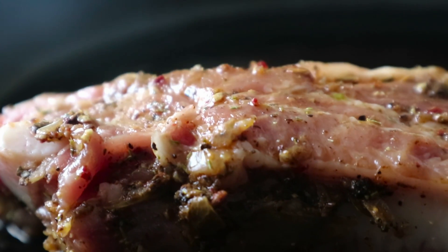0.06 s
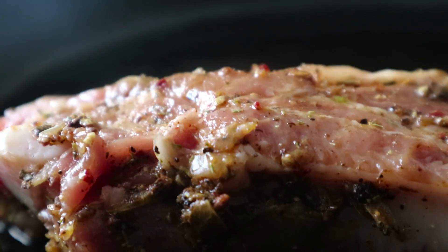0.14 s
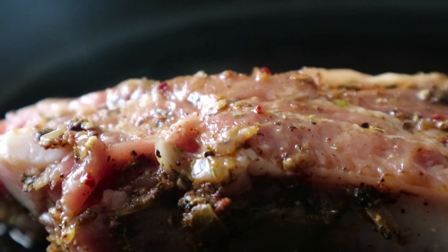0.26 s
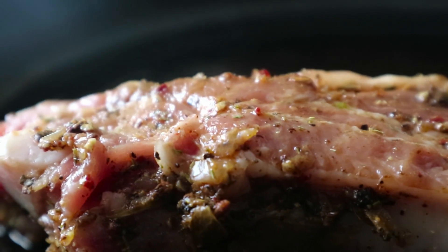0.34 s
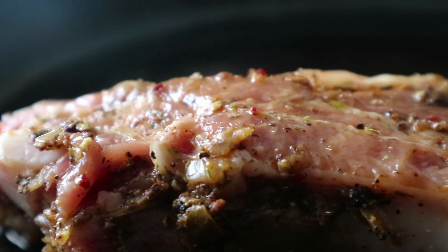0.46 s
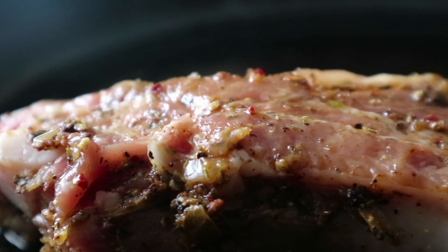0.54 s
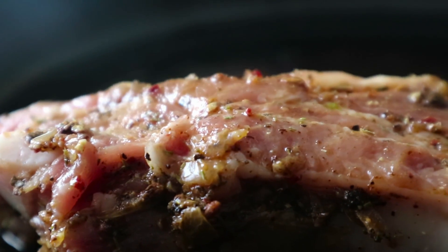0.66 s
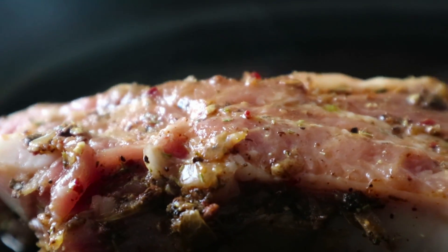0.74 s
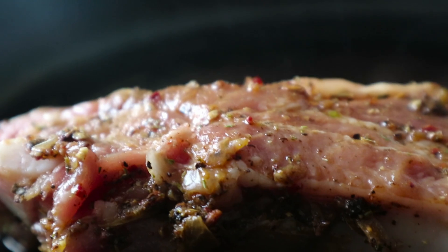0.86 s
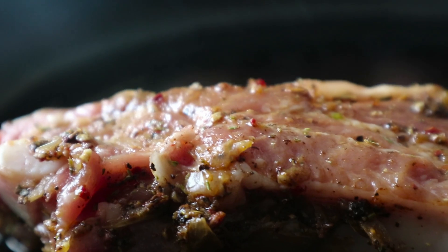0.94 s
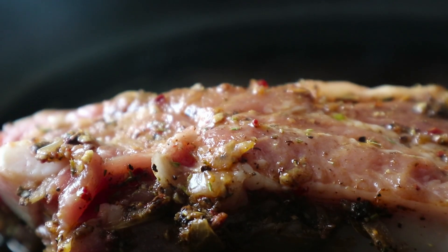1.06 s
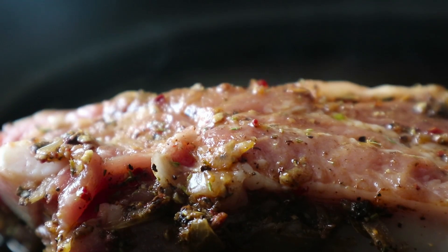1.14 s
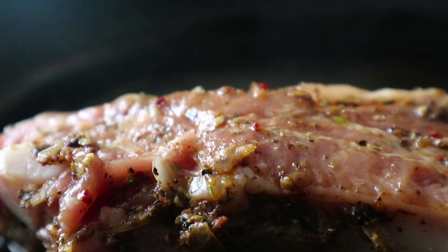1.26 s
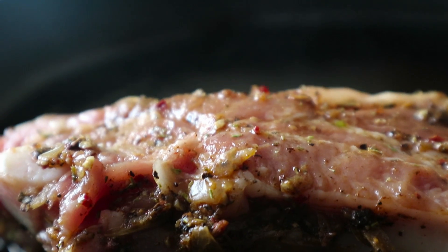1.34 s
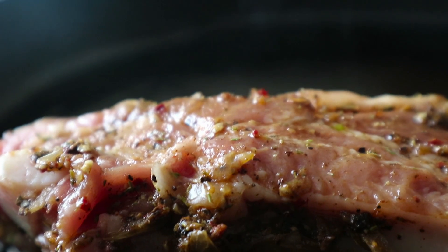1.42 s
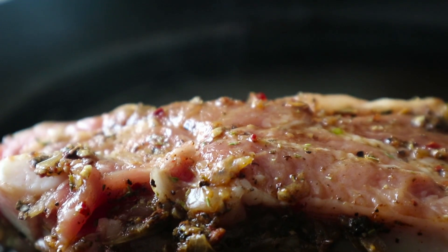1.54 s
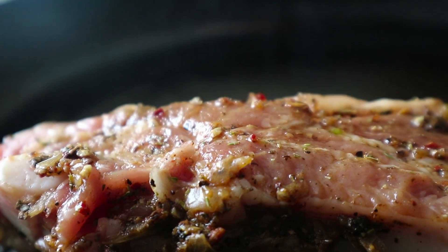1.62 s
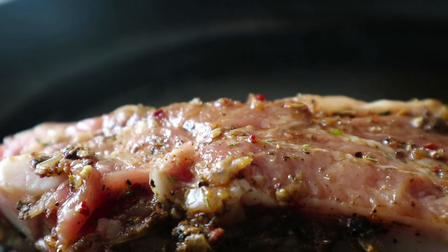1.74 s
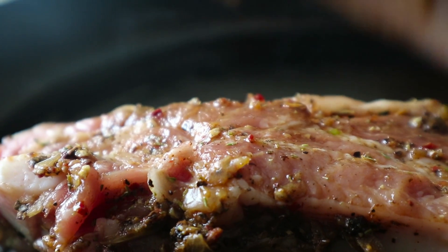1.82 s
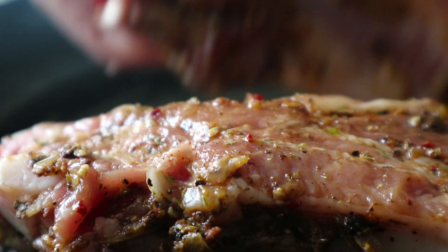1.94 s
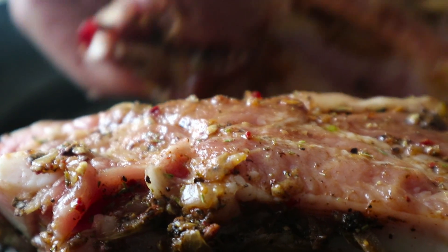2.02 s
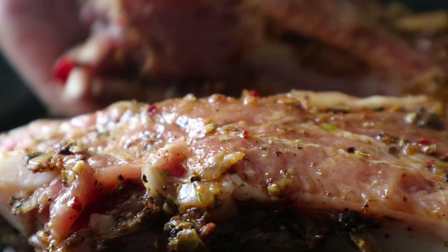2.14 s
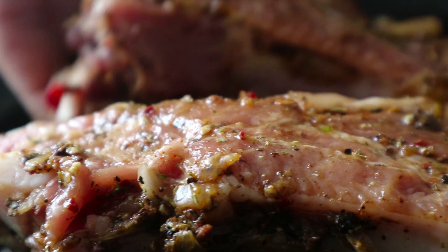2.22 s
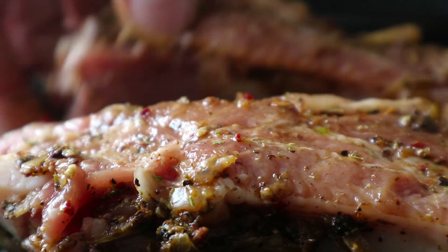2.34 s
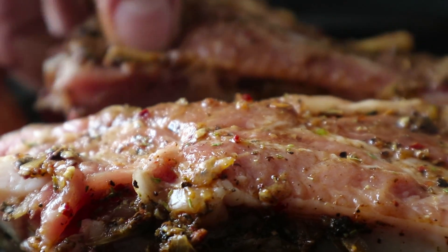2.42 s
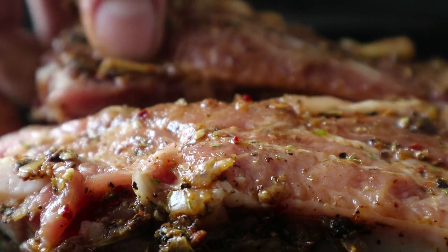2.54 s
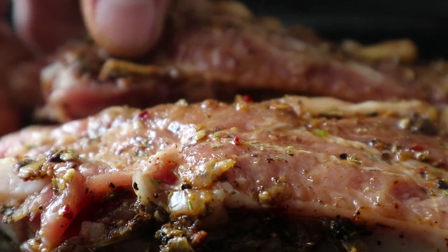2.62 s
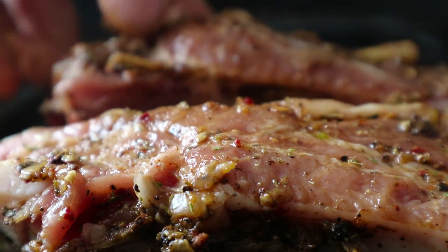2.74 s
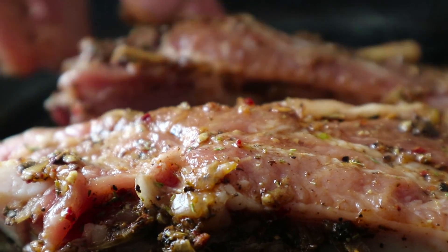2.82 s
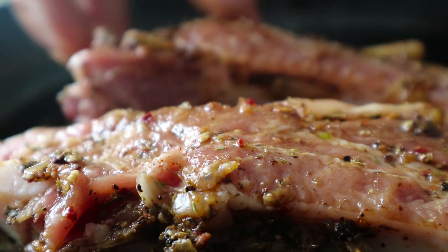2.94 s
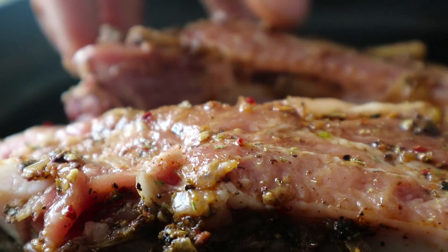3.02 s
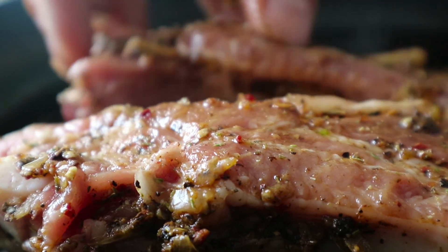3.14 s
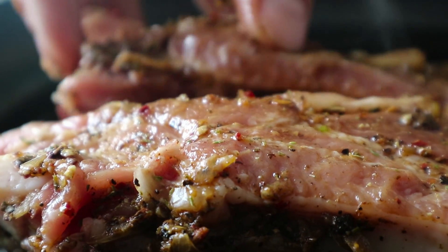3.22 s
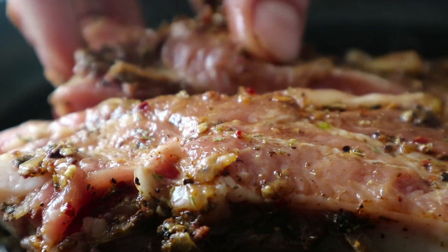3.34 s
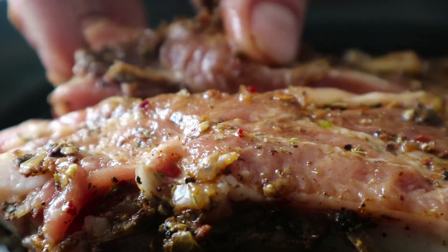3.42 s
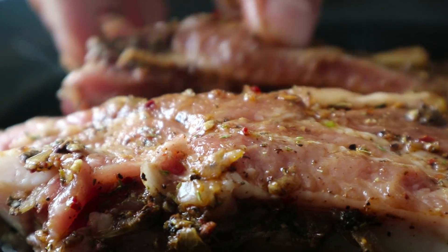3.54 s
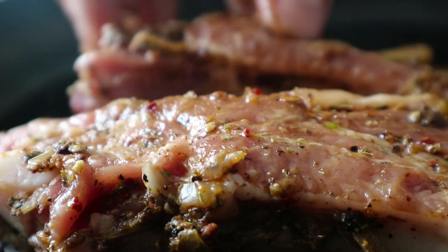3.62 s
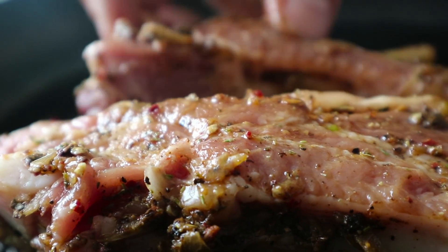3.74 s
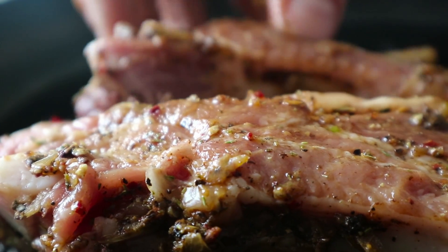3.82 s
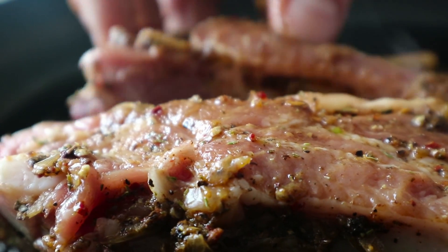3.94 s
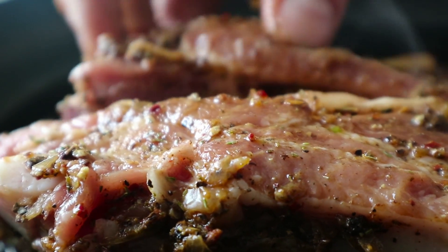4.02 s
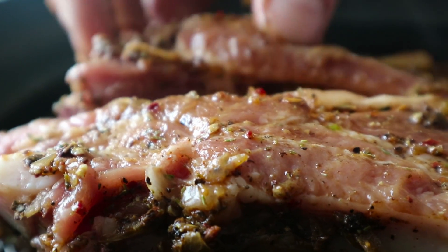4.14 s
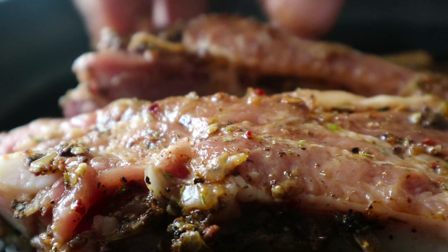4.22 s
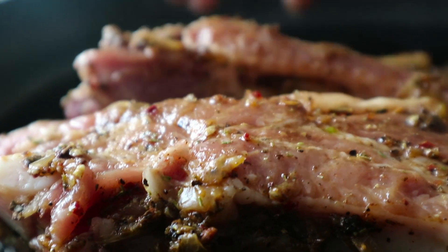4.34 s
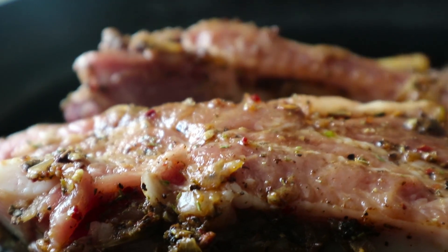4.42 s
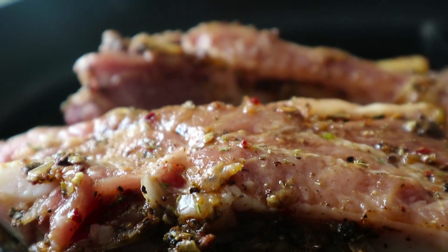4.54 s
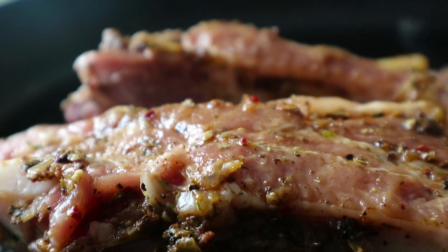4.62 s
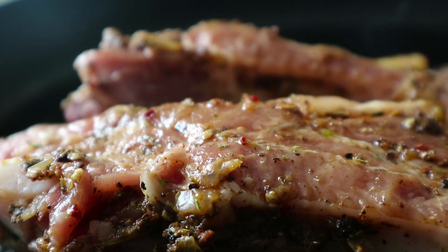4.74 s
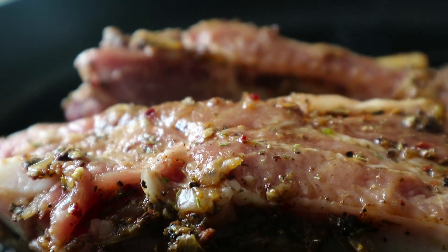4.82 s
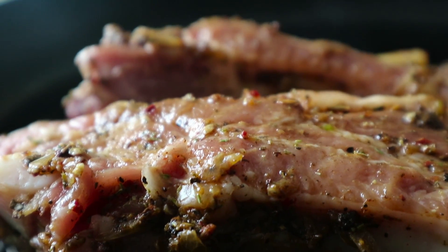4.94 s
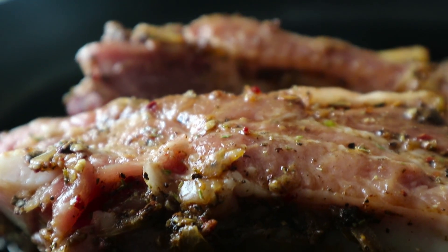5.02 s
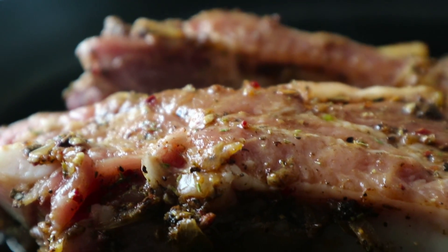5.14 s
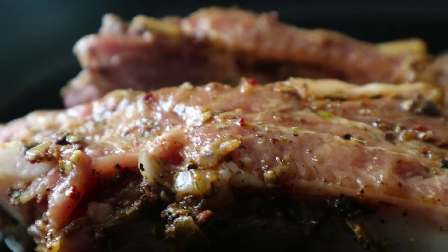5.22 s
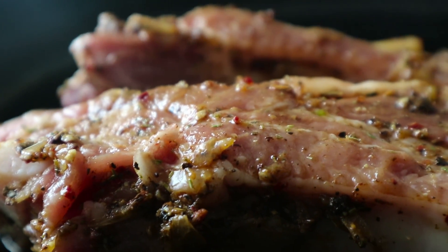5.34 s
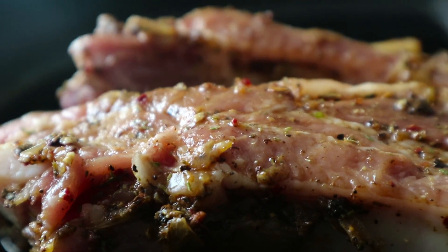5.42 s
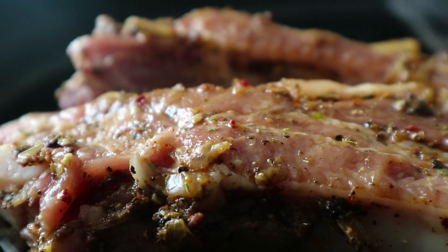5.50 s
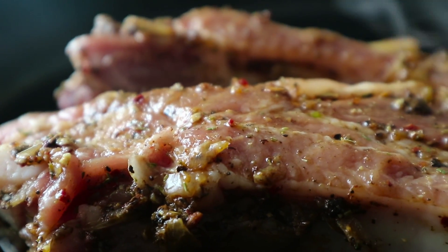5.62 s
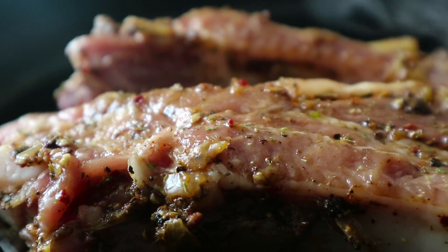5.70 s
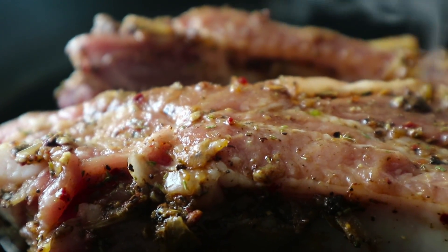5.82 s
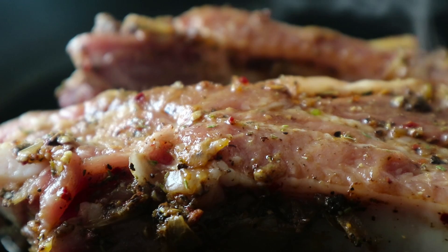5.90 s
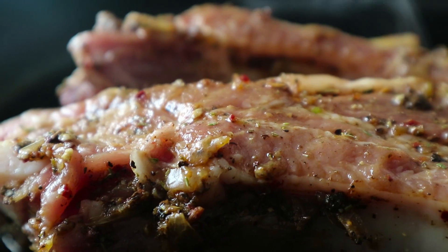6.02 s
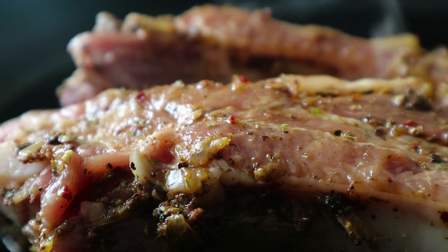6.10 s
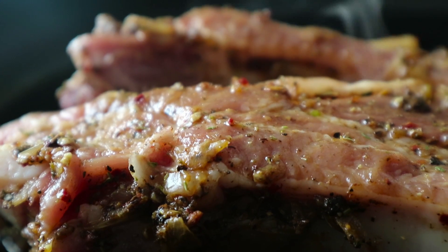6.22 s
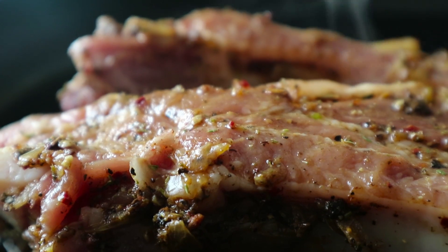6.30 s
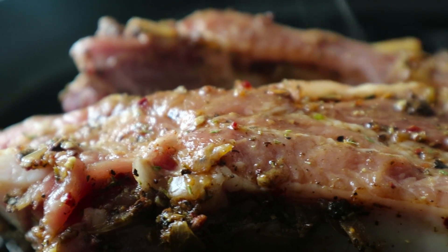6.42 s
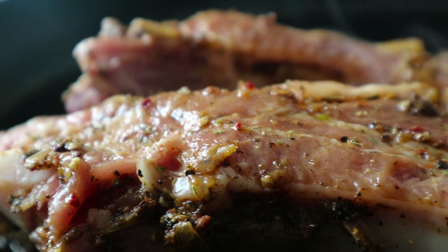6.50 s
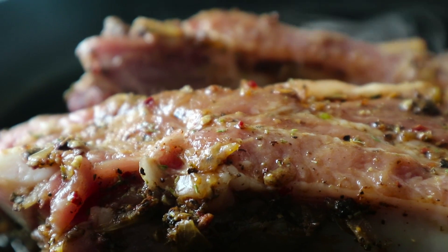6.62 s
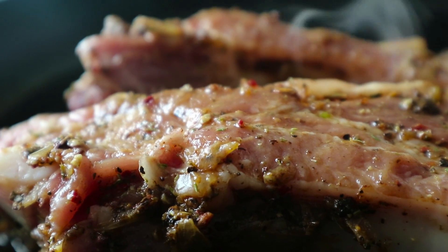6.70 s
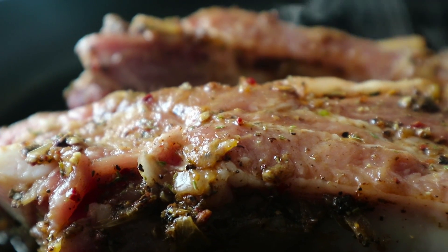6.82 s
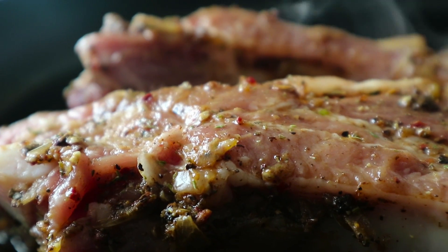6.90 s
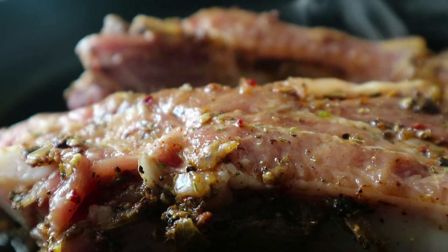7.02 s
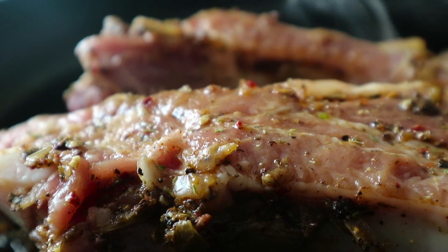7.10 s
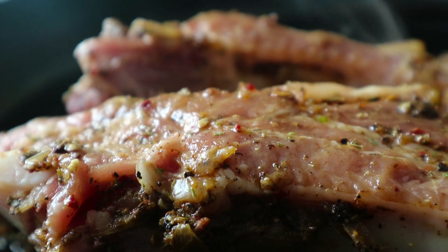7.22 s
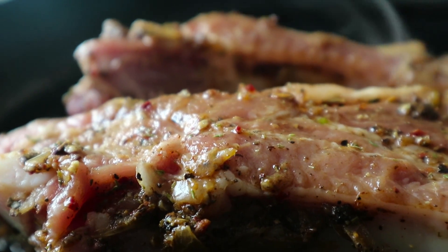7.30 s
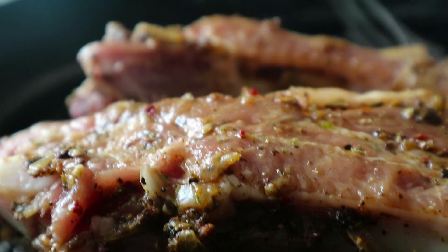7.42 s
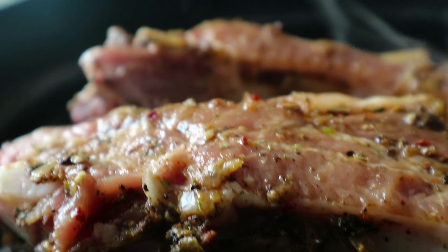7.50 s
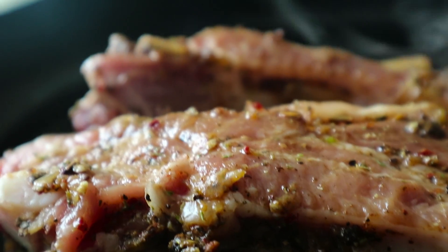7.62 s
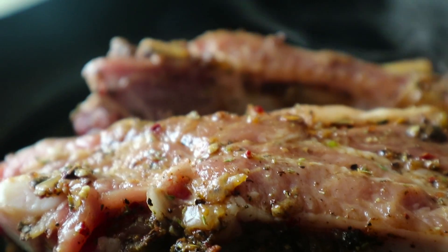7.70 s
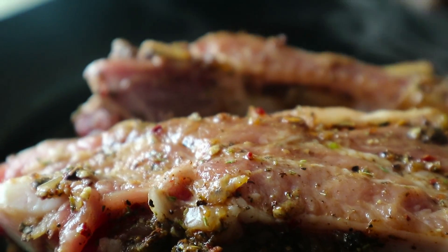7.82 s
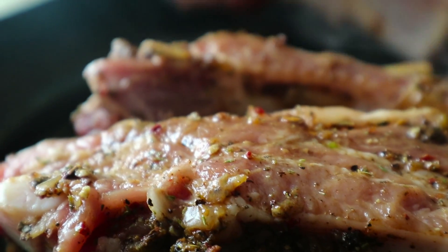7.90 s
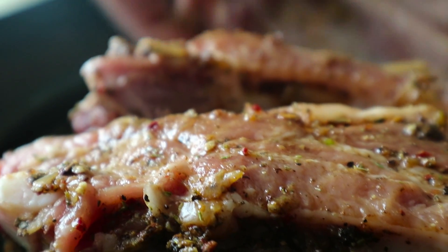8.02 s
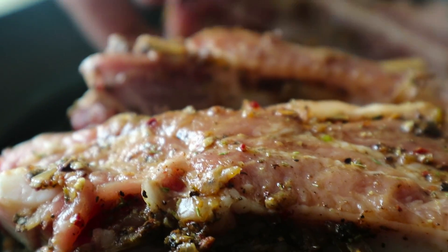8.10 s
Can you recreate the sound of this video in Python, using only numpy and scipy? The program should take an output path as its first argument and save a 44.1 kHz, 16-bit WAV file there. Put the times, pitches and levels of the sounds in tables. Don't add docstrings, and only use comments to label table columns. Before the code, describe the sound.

Stereo microphones at arm's length from a frying pan. Thin hiss and light bubbling come first, then wet meat touches hot oil: a fast rise to dense sizzling, airy steam squeals sinking and rising in pitch as it is pressed, and hard snaps of fat. After release the hiss drops, leaving drier, grainier frying and loud scattered pops in a small reflective kitchen.

```python
import sys
import numpy as np
from scipy import signal
from scipy.fft import rfft, irfft, next_fast_len
from scipy.io import wavfile
from scipy.ndimage import uniform_filter1d, map_coordinates

SR = 44100
rng = np.random.default_rng(int(sys.argv[2]) if len(sys.argv) > 2 else 0)


def to_wav(sig):
    pcm = np.clip(np.atleast_2d(sig), -1, 1) * 32767
    pcm = np.round(pcm).astype(np.int16)
    wavfile.write(sys.argv[1], SR, pcm.T)


def linear_from_db(decibels):
    return 10 ** (np.asarray(decibels, float) / 20)


N = 359856

# (time [s], level [dB])
SIZZLE_LEVEL = [(2.05, -45), (2.13, -43.5), (2.28, -37), (2.46, -33), (2.63, -33.5), (2.85, -31.5),
                (3.02, -31), (3.2, -29.5), (3.45, -32), (3.64, -31.5), (3.78, -29), (4.02, -27.5),
                (4.28, -31.5), (4.55, -33.5), (5.55, -35), (6.31, -35), (7.3, -35), (8.16, -35.5)]
# (frequency [Hz], level [dB])
ROOM_RETURN = [(300, -3.5), (1400, -5), (3000, 3.5), (7000, -1.5), (15000, 11)]


def unit(x):
    return x / np.sqrt(np.mean(x ** 2) + 1e-20)


def along(points, hz):
    f, v = np.transpose(points)
    return np.interp(np.log(hz + 1), np.log(f + 1), v)


def curves(rows, before_db=None, after_db=None):
    s, *cols = np.transpose(rows)
    return [np.interp(np.arange(N) / SR, s, c, before_db, after_db) for c in cols]


def wobble(rate):
    knots = rng.standard_normal(int(N * 400 / SR))
    return map_coordinates(knots, [np.arange(N) * rate / SR])


def filtered(x, response):
    m = next_fast_len(N + SR // 2)
    return irfft(rfft(x, m) * response(np.fft.rfftfreq(m, 1 / SR)), m)[..., :N]


def coloured(x, spectrum):
    hz, power = signal.welch(x[0], SR, nperseg=256, detrend=False)

    def swap(f):
        return linear_from_db(along(spectrum, f)) / np.sqrt(np.interp(f, hz, power) + 1e-14)
    return unit(filtered(x, swap))


def late_left(x):
    return np.array([np.roll(x, 2), x])


def bursts(s, db, hz, pan_db, lag, life, size, front=None):
    k = np.arange(size) - size // 4
    if front is None:
        rise_cycles, steepness = .56, 4
    else:
        rise_cycles, steepness = front[:, None], 2.6
    out = np.zeros((2, N + size))
    for ch, side in enumerate((.5, -.5)):
        at = s * SR + side * lag
        u = (k - (at % 1)[:, None]) * (hz / SR)[:, None]
        rise = np.exp(-np.abs(u / rise_cycles) ** steepness)
        decay = np.exp(-np.abs(u / life[:, None]) ** 1.4)
        shape = np.where(u < 0, rise, decay)
        wave = linear_from_db(db + side * pan_db)[:, None] * shape * np.cos(2 * np.pi * u) * signal.windows.tukey(size)
        where = np.clip(at.astype(int)[:, None] + k, 0, N + size - 1)
        out[ch] = np.bincount(where.ravel(), wave.ravel(), N + size)
    return out[:, :N]


def fizz(count, mid_hz, spread, scatter_db, life, lag, lag_spread):
    s = rng.uniform(0, N / SR, count)
    g = rng.standard_normal((count, 3))
    db = scatter_db * np.minimum(rng.exponential(size=count), 2.9)
    hz = np.clip(mid_hz * np.exp(spread * g[:, 0]), 500, 14000)
    return bursts(s, db, hz, 2.9 * g[:, 1], lag + lag_spread * g[:, 2], np.full(count, life), size=64)


def hiss(patchy_db):
    z = signal.stft(rng.standard_normal(N), nperseg=512)[2]
    field = uniform_filter1d(rng.standard_normal(z.shape), 7, 0)
    field = uniform_filter1d(field, 9, 1)
    return late_left(signal.istft(z * linear_from_db(patchy_db * unit(field)), nperseg=512)[1][:N])


def rumble():
    # (frequency [Hz], density [dB per Hz])
    low_colour = [(12, -54), (20, -20), (38, -23), (81, -23.5), (168, -5.5), (319, -14), (400, -1),
                  (520, 3.5), (880, -120)]
    # (time [s], level [dB])
    thuds = [(.1, -66), (.25, -64), (.4, -66), (.77, -64), (2.89, -57), (3.27, -61), (3.75, -61),
             (3.88, -63), (4.02, -56), (4.15, -61), (2.6, -63), (6.3, -63), (6.87, -63), (5.38, -61),
             (5.6, -62), (6.04, -62), (7.48, -62)]
    hum_db, thud_s = -62.5, .05
    a, b = rng.standard_normal((2, N)) * linear_from_db(3.5 * wobble(12))
    t = np.arange(N) / SR
    level = linear_from_db(hum_db) + sum(linear_from_db(db) * np.exp(-((t - s) / thud_s) ** 2) for s, db in thuds)
    return level * coloured(np.array([a + 0.59 * b, a - 0.61 * b]), low_colour)


def first_rib():
    # (time [s], level [dB])
    simmer_level = [(0.0, -35.5), (1.38, -36), (2.0, -35)]
    # (frequency [Hz], density [dB per Hz])
    simmer_colour = [(90, -50), (150, -26.5), (400, -17.5), (800, -11), (1300, -9.5), (1750, -6.5),
                     (2300, -11), (3260, -12.5), (5000, -15), (6000, -13.5), (7500, -18.5), (10000, -23),
                     (15800, -36.5)]
    level_db, = curves(simmer_level)
    oil = unit(fizz(count=12000, mid_hz=2250, spread=0.68, scatter_db=3.5, life=1.6, lag=.3, lag_spread=1.2))
    sputter_db = 0.85 * wobble(5.7) + 0.99 * wobble(60)
    return linear_from_db(level_db + sputter_db) * coloured(oil + 1.26 * unit(hiss(patchy_db=0.5)), simmer_colour)


def second_rib():
    # (frequency [Hz], density [dB per Hz])
    bubbling_colour = [(150, -70), (300, -22), (700, -15), (950, -10), (1200, -3), (1970, -1), (2700, -3),
                       (3200, 1), (4000, -3), (4830, -9.5), (7300, -13), (12000, -26.5), (16000, -33)]
    # (frequency [Hz], density [dB per Hz])
    steam_colour = [(500, -23), (1500, -6.5), (3000, -2), (5000, -0.5), (7000, -4.5), (10000, -11.5),
                    (13000, -22), (15800, -28)]
    wet_until_s, drying_s = 3.95, 0.62
    laid_flat_s, tipping_s = 2.47, .07
    t = np.arange(N) / SR
    sizzle_db, = curves(SIZZLE_LEVEL, before_db=-66)
    wet = np.clip((wet_until_s + drying_s - t) / drying_s, 0, 1)
    tipped = np.clip((laid_flat_s - t) / tipping_s, 0, 1)
    bubbling_db = sizzle_db - 7.5 * wet + 3 * tipped
    steam_db = sizzle_db + 2 * wet - 7 * tipped
    sputter_db = 0.12 * wobble(11) + 0.79 * wobble(70)
    oil = unit(fizz(count=16000, mid_hz=2440, spread=.55, scatter_db=4, life=1.1, lag=1.4, lag_spread=.8))
    spray = unit(fizz(count=12000, mid_hz=7270, spread=.5, scatter_db=4.5, life=.9, lag=1.6, lag_spread=.8))
    bubbles = coloured(oil + 0.99 * unit(hiss(patchy_db=1.0)), bubbling_colour)
    bubbles = linear_from_db(bubbling_db + 6.5 + sputter_db) * bubbles
    steam = coloured(spray + 1.5 * unit(hiss(patchy_db=-1.9)), steam_colour)
    steam = linear_from_db(steam_db + 3.0 + sputter_db + 0.69 * wobble(12)) * steam
    return bubbles + steam


def pockets():
    # (time [s], pitch [Hz], level [dB])
    long_pockets = [
        [(2.65, 2077, -38), (2.85, 2060, -29.5), (3.08, 2015, -29), (3.5, 1830, -25), (3.62, 1699, -26.5),
         (3.85, 1657, -32), (4.0, 1595, -34)],
        [(3.5, 1410, -36), (3.9, 1386, -37.5), (4.05, 1270, -26.5), (4.2, 1190, -29.5), (4.3, 1188, -42),
         (4.4, 1235, -56)],
        [(2.75, 3700, -40), (2.95, 3820, -29), (3.3, 3854, -32), (3.55, 4050, -30), (4.25, 4044, -36.5),
         (4.4, 3970, -56)],
        [(4.22, 1387, -32), (4.42, 1442, -34.5), (4.8, 1498, -32.5), (5.05, 1610, -38), (5.3, 1575, -48)],
        [(5.2, 1195, -44), (5.6, 1203, -39), (6.2, 1198, -40), (6.6, 1220, -56)],
    ]
    long_damping = [580, 340, 440, 800, 380]
    # (peak time [s], half length [s], pitch [Hz], level [dB])
    short_puffs = [(4.09, .3, 3040, -28.5), (4.3, .07, 3000, -20.5), (4.46, .16, 3120, -32),
                   (4.17, .3, 790, -40), (6.93, .3, 3300, -33), (3.27, .12, 3120, -33),
                   (3.08, .15, 2000, -32), (1.84, .012, 5700, -38), (3.2, .04, 1700, -25),
                   (7.555, .008, 5500, -24), (7.5855, .008, 5950, -28), (7.534, .008, 3100, -24),
                   (4.4, .15, 1450, -32)]
    puff_damping_hz, puff_fade_db = 380, 18
    sputter_db, waver = 1.3, .012
    puffs = []
    for s, half, hz, db in short_puffs:
        faint_db = db - puff_fade_db
        puffs.append([(s - half, hz, faint_db), (s, hz, db), (s + half, hz, faint_db)])
    dampings = long_damping + [puff_damping_hz] * len(puffs)
    out, t = np.zeros(N), np.arange(500) / SR
    for rows, damping_hz in zip(long_pockets + puffs, dampings):
        span = slice(int(rows[0][0] * SR), int(rows[-1][0] * SR))
        hz, db = (c[span] for c in curves(rows))
        ring = t * np.exp(-np.pi * damping_hz * t)
        jet = np.array([1, 1j]) @ rng.standard_normal((2, N))
        jet = jet * linear_from_db(1.5 * wobble(110) + sputter_db * wobble(25))
        hz = hz * (1 + waver * wobble(30)[span])
        resonance = signal.fftconvolve(jet[span], ring)[:len(hz)]
        tone = np.real(resonance * np.exp(2j * np.pi * np.cumsum(hz) / SR))
        out[span] += unit(linear_from_db(db) * tone) * np.sqrt(np.mean(linear_from_db(2 * db)))
    return late_left(out)


def spits():
    count = 160
    s = rng.uniform(size=count) * N / SR
    g = rng.standard_normal((count, 2))
    sizzle_db = np.maximum(np.interp(s, *np.transpose(SIZZLE_LEVEL)), -46)
    db = np.minimum(13.5 + sizzle_db + 1.5 * g[:, 0], -17)
    return np.array([s, db, 2700 * np.exp(.25 * g[:, 1])])


def pops():
    # (time [s], peak level [dB], pitch [Hz])
    first_pops = [(.0172, -20.5, 1950), (.0304, -19, 4600), (.1179, -20, 1790), (.4238, -21, 4000),
                  (.4438, -19.5, 2000), (.5273, -14.5, 1750), (.5518, -23, 1800), (.6659, -20, 1830),
                  (.721, -21, 1920), (.75, -22.5, 1430), (.7654, -17.5, 2200), (.8199, -22.5, 2030),
                  (.9941, -23, 4100), (1.1405, -18.5, 2000), (1.2191, -22.5, 1880), (1.3309, -23.5, 1840),
                  (1.6331, -27, 2300), (1.6625, -24, 1300), (1.748, -23, 1670), (1.8528, -23, 2900),
                  (2.0708, -11.5, 1500)]
    # (time [s], peak level [dB], pitch [Hz], crack over the usual [dB])
    second_pops = [(2.3806, -15, 2720, 2), (2.5074, -13, 4770, 0), (3.0152, -10, 3900, -3),
                   (3.0163, -8.5, 3800, -6), (3.1303, -12, 3140, 0), (3.2725, -3, 3700, -10),
                   (3.2735, -5, 3900, -8), (3.8589, -9, 3940, -2), (4.5011, -9, 1460, 0),
                   (4.5766, -10, 2550, 3), (4.7143, -8.5, 1640, -2), (4.8648, -6.5, 2800, 4),
                   (4.8672, -12, 1300, 0), (5.0198, -7, 3100, 0), (5.1359, -11, 3410, 0),
                   (5.3788, 0, 2900, -25), (5.5053, -11, 3410, -3), (5.5889, -2.5, 1520, -4),
                   (5.918, -10, 3190, 0), (6.0828, -10, 3840, 0), (6.2126, -11, 3190, 2),
                   (6.9152, -11, 1500, 3), (7.0164, -10, 3310, -3), (7.3313, -6, 1950, 5),
                   (7.4817, -2.5, 1580, -5), (7.5547, -16, 5500, -10), (7.5855, -22, 6000, -10),
                   (7.6423, -15, 2390, 2), (7.6878, -9.5, 2400, 11), (7.7286, -8.5, 4800, 0),
                   (7.7293, -11, 4200, 2), (7.7296, -11, 1500, 0), (7.8436, -6, 2550, 1)]
    # (time [s], peak level [dB], pitch [Hz])
    middling_pops = [(0.0363, -24, 1440), (0.0586, -21, 1700), (0.0751, -25, 1450), (0.227, -24, 2280),
                     (0.3674, -26, 2150), (0.45, -26, 3300), (0.4641, -24, 1950), (0.5945, -26, 1380),
                     (0.7555, -25, 1770), (0.8585, -26, 1700), (0.8808, -24, 1710), (1.042, -26, 1350),
                     (1.0807, -24, 1780), (1.0967, -26, 1360), (1.1343, -26, 1580), (1.2688, -25, 1680),
                     (1.2768, -26, 1940), (1.3037, -26, 1670), (1.3634, -26, 1660), (1.5488, -24, 1730),
                     (1.5676, -25, 1690), (1.6913, -25, 1390), (1.8339, -26, 3520), (1.8574, -25, 1670),
                     (1.9062, -26, 2130), (1.9128, -26, 1910), (1.9633, -25, 1720), (2.1909, -21, 3690),
                     (2.2421, -20, 2950), (2.3055, -19, 1640), (2.3613, -18, 3510), (2.4633, -16, 3420),
                     (2.6582, -13, 3380), (2.7769, -14, 4190), (2.7844, -14, 4820), (2.7984, -14, 1970),
                     (2.8348, -14, 4240), (2.9197, -16, 2360), (2.9846, -12, 2070), (3.5538, -11, 1780),
                     (3.7156, -12, 3170), (3.8113, -11, 2990), (4.0005, -11, 3040), (4.0826, -12, 2150),
                     (4.1636, -12, 1900), (4.4194, -14, 3040),
                     (4.4658, -12, 3000), (4.547, -14, 2070), (4.6652, -15, 2680), (4.7061, -14, 3020),
                  (4.744, -15, 1640), (4.7885, -13, 1560), (4.8051, -15, 2920), (4.9147, -14, 2640),
                  (4.9442, -15, 2710), (4.9871, -15, 1500), (5.1102, -15, 2600), (5.1284, -15, 3040),
                  (5.174, -14, 3790), (5.3313, -14, 2680), (5.3561, -16, 2650), (5.3877, -16, 2780),
                  (5.4185, -15.5, 4600), (5.4467, -15, 1640), (5.5108, -16, 1830), (5.5601, -16, 2450),
                  (5.6079, -15, 2980), (5.6206, -15, 2870), (5.6481, -14, 2730), (5.699, -13, 3250),
                  (5.744, -16, 1470), (5.7985, -13, 3090), (5.8076, -15, 2650), (5.8411, -14, 4110),
                  (5.8528, -16, 2920), (5.8697, -15, 2700), (5.9462, -13, 3120), (5.9561, -16, 1710),
                  (6.072, -15, 1530), (6.1688, -16, 1820), (6.1992, -18, 3040), (6.2357, -13, 1950),
                  (6.3463, -16, 3640), (6.4296, -16, 3670), (6.4392, -15, 2040), (6.4949, -15, 2900),
                  (6.516, -14, 2720), (6.5776, -14, 2700), (6.7844, -14, 1720), (6.9281, -14, 2070),
                  (6.964, -13, 2930), (7.0396, -15, 2820), (7.0653, -15, 1920), (7.1126, -16, 2800),
                  (7.1306, -16, 2320), (7.2351, -14, 2260), (7.2806, -17, 3340), (7.2886, -16, 1700),
                  (7.4587, -16, 2440), (7.475, -16, 3400), (7.534, -16, 3080), (7.803, -14, 2200),
                  (7.9933, -17, 3340), (8.0051, -14, 1100), (8.051, -17, 2610), (8.1486, -16, 4110)]
    # (time [s], peak level [dB], pitch
    # [Hz])
    further_pops = [(0.2509, -25, 1380), (0.2945, -25, 1510), (0.5173, -25, 1380), (0.5484, -25, 1720),
                    (0.5774, -25, 1640), (0.6756, -25, 1720), (0.7454, -24, 1850), (0.9114, -26, 1250),
                    (0.9599, -26, 1120), (1.0701, -25, 1510), (1.2536, -26, 2150), (1.2974, -25, 1680),
                    (1.4647, -25, 1590), (1.4767, -26, 2110), (1.6287, -25, 1510), (1.64, -25, 1770),
                    (1.6662, -26, 3830), (1.6832, -26, 2020), (1.7795, -25, 1420), (1.8259, -26, 1680),
                    (2.1147, -24, 1290), (2.2724, -21, 2630), (2.2829, -22, 3960), (2.3125, -21, 5940),
                    (2.4331, -19, 2840), (2.504, -18, 2580), (2.52, -17, 2330), (2.5917, -17, 3530),
                    (2.6001, -17, 3620), (2.7148, -15, 2500), (2.7239, -16, 2840), (2.8833, -13, 4090),
                    (2.9609, -10, 2330), (2.9652, -13, 2540), (3.0316, -12, 3880), (3.0474, -11, 1940),
                    (3.0749, -12, 3660), (3.0791, -11, 2070), (3.3625, -11, 2110), (3.4, -11, 3530),
                    (3.5087, -12, 1810), (3.7004, -12, 3570), (3.7792, -12, 1680), (3.7831, -10, 1590),
                    (3.8157, -12, 1720),
                    (3.8267, -11, 1890), (3.8705, -11, 1550), (3.8902, -11, 3880), (3.95, -11, 2070),
                    (4.0239, -11, 1420), (4.2096, -12, 3140), (4.2969, -12, 2630), (4.3176, -12, 3010),
                    (4.9404, -15, 2800), (4.9641, -14, 1770), (4.9696, -14, 1420), (4.9985, -14, 2200),
                    (5.0132, -14, 3010), (5.5737, -16, 3230), (5.7551, -16, 1640), (5.7797, -13, 3400),
                    (5.7881, -16, 1720), (5.7912, -15, 2020), (5.8193, -16, 3360), (5.9752, -16, 1460),
                    (6.1321, -16, 1510), (6.2787, -14, 2970), (6.3225, -17, 2970), (6.3576, -16, 2330),
                    (6.4, -17, 2200), (6.4074, -17, 2280), (6.5927, -16, 1550), (6.6857, -17, 3140),
                    (6.7016, -17, 1680), (6.731, -17, 2070), (6.8645, -16, 3320), (6.8797, -15, 3140),
                    (6.9013, -15, 1550), (7.6345, -15, 1890), (7.8371, -16, 2240), (7.9206, -15, 1680),
                    (8.0989, -16, 1550), (8.1261, -17, 3060), (8.1431, -15, 3270)]
    first, second = np.transpose(first_pops), np.transpose(second_pops)
    ticks = np.transpose(middling_pops)
    further = np.transpose(np.add(further_pops, (0, -1.5, 0)))
    s, db, hz = np.hstack([first, second[:3], ticks, further, spits()])
    extra_db = np.zeros(len(s))
    extra_db[len(first_pops):len(first_pops) + len(second_pops)] = second[3]

    g = rng.standard_normal((len(s), 4))
    pan_db = -2 + 1.4 * g[:, 3]
    lag = 1.3 + .3 * g[:, 0]
    pitch = hz / 3000
    crack_db = db - 11 + 8 * np.log2(pitch) + extra_db
    life = 1.1 * pitch ** .7 * np.exp(.1 * g[:, 1])
    front = .63 * pitch ** .3
    tear_s = s - .063 / hz
    crack_hz = 6200 * np.exp(0.15 * np.tanh(g[:, 2]))
    snap_hz = 9300 * np.exp(.15 * np.tanh(g[:, 1]))
    body = bursts(s, db - 1.2, hz, pan_db + 1.5, lag, life, size=256, front=front)
    crack = bursts(tear_s, crack_db - .7, crack_hz, pan_db - 3, lag, 1.6 * life, size=64)
    snap = bursts(tear_s, crack_db - 3.5, snap_hz, pan_db - 3, lag, np.ones(len(s)), size=64)
    low_hz = 260
    return filtered(body + crack + snap, lambda f: (1j * f / (low_hz + 1j * f)) ** 2)


def pan(x):
    # (frequency [Hz], width [Hz], level [dB])
    pan_modes = [(870, 13, -0.5), (704, 9.1, -6), (1936, 20, 2), (3100, 16, 0.5), (1364, 33, -17),
                 (2442, 29, -0.5), (1226, 180, -8.5), (1747, 125, -8), (2680, 110, -8.5), (3100, 60, -32),
                 (3980, 180, -15.5), (5500, 89, -33)]

    def ringing(f):
        return 1 + sum(linear_from_db(db) * 1j * f * w / (c * c - f * f + 1j * f * w) for c, w, db in pan_modes)
    return filtered(x, ringing)


def kitchen(x):
    # (frequency [Hz], decay by 60 dB [s])
    decay_time = [(300, 0.17), (2000, 0.61), (10000, 0.059)]
    hz, _, z = signal.stft(x, SR, nperseg=256)
    keep = linear_from_db(-2 * 60 * 128 / SR / along(decay_time, hz))
    energy = np.mean(np.abs(z) ** 2, axis=0)
    linger = np.array([signal.lfilter([0, 1 - k], [1, -k], e) for k, e in zip(keep, energy)])
    scatter = signal.stft(rng.standard_normal((2, N)), SR, nperseg=256)[2]
    scatter = scatter / np.sqrt(np.mean(np.abs(scatter) ** 2))
    wet = linear_from_db(along(ROOM_RETURN, hz))[:, None] * np.sqrt(linger) * scatter
    return signal.istft(wet, SR, nperseg=256)[1][:, :N]


def stove(x):
    # (frequency [Hz], width [Hz], level [dB])
    stove_modes = [(140, 12, -3), (178, 16, -6), (248, 14, -5), (300, 16, -1), (342, 16, -3), (414, 22, -6),
                   (630, 30, -8), (720, 40, -1), (802, 14, -6), (876, 22, 0), (992, 20, -8), (1130, 26, -8)]

    def lift_and_dip(f):
        return 1 + sum(linear_from_db(db) * f * w / (c * c - f * f + 1j * f * w) for c, w, db in stove_modes)
    return filtered(x, lift_and_dip)


def scene():
    def share(hz):
        return 1 / np.sqrt(1 + linear_from_db(2 * along(ROOM_RETURN, hz)))

    def bass_cut(hz):
        return (1j * hz / (230 + 1j * hz)) ** 3
    frying = pan(first_rib() + second_rib() + pockets())
    big = pan(pops())
    near = filtered(frying + kitchen(frying), share) + big + linear_from_db(-9) * kitchen(big)
    return stove(filtered(near, bass_cut) + rumble())


def low_pass(x):
    return signal.sosfilt(signal.butter(12, 15840, fs=SR, output="sos"), x)


def record(dry):
    # (frequency [Hz], width [Hz], level [dB])
    housing_dips = [(4650, 300, -2), (8000, 300, -3), (9550, 250, -6.5), (12600, 350, -6), (15750, 900, -5)]
    # (frequency [Hz], level [dB])
    port_tilt = [(60, -.3), (180, 1), (550, 1.3), (1650, -2), (4970, -1), (15000, -3)]

    def microphone(hz):
        dips_db = sum(db * np.exp(-(2 * (hz - c) / w) ** 2) for c, w, db in housing_dips)
        tilt_db = np.outer([.5, -.5], along(port_tilt, hz))
        return linear_from_db(tilt_db + dips_db) * (hz < 15830)
    return low_pass(filtered(dry, microphone))


dry = scene()
out = record(dry)
to_wav(out)
```